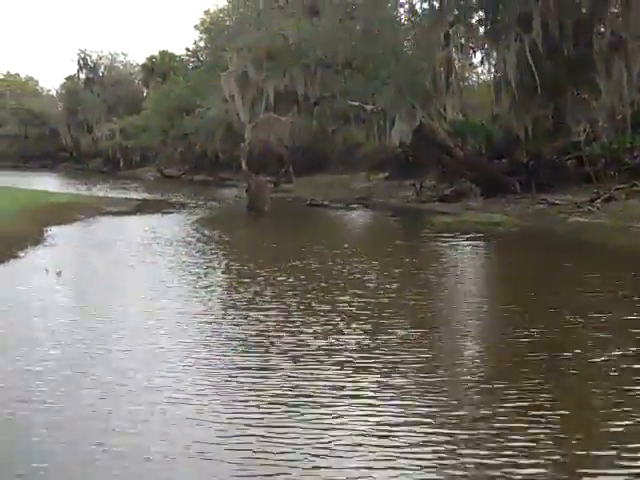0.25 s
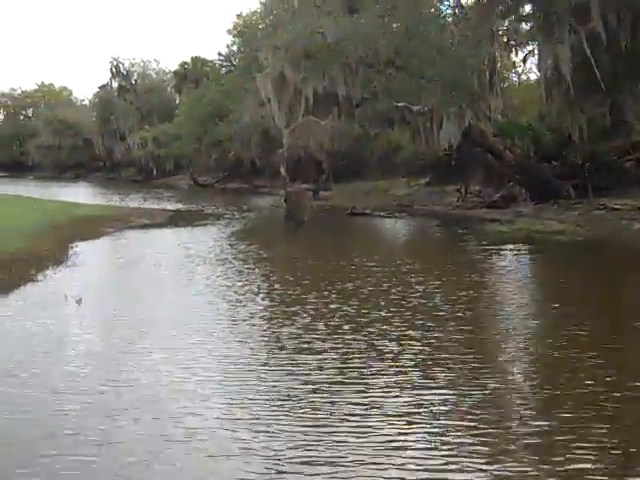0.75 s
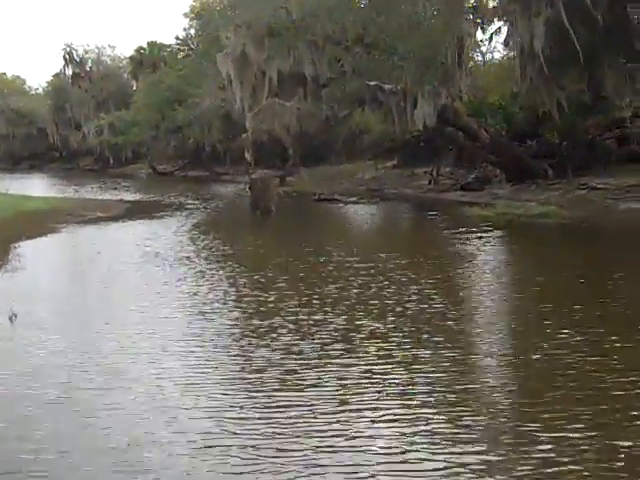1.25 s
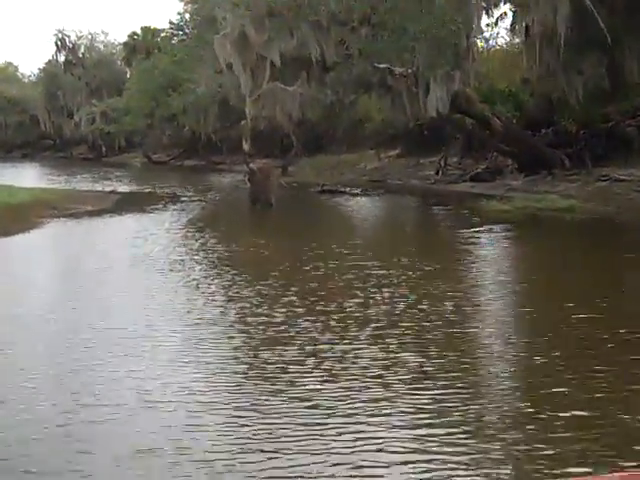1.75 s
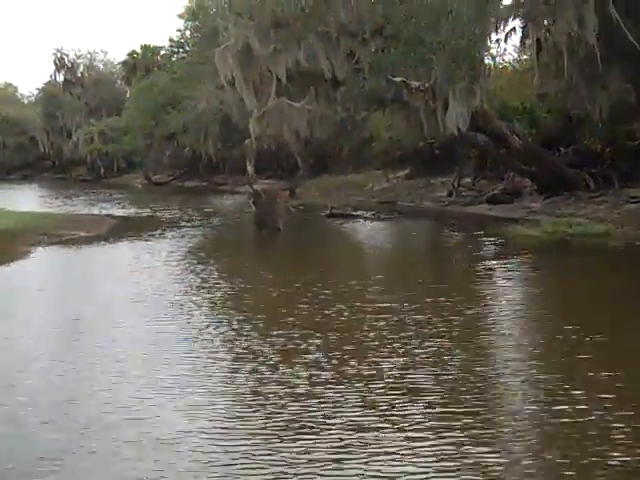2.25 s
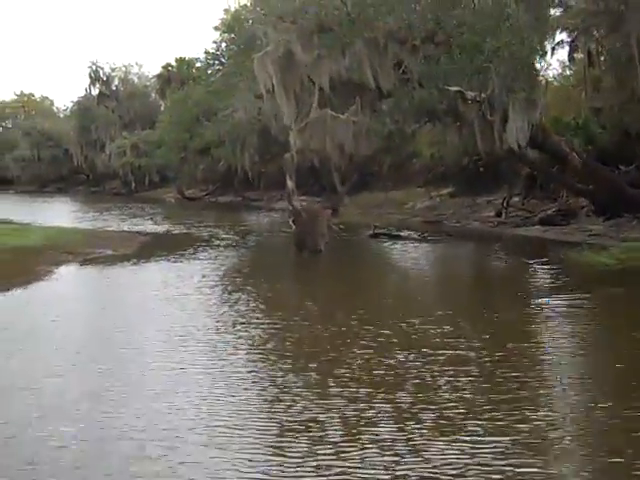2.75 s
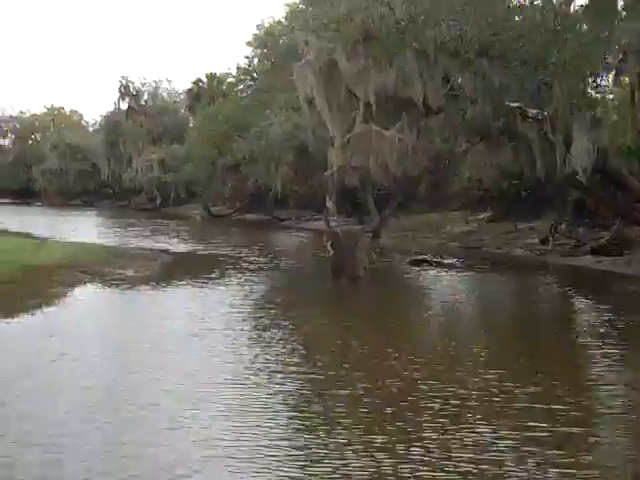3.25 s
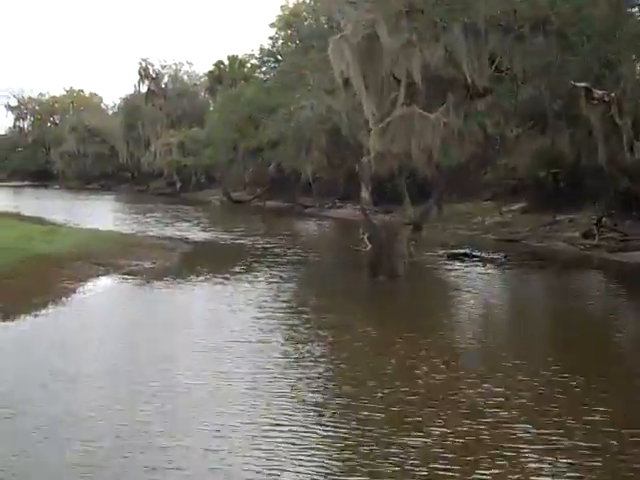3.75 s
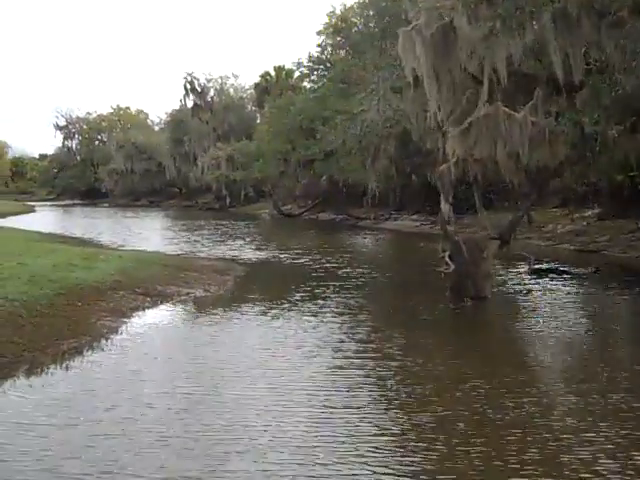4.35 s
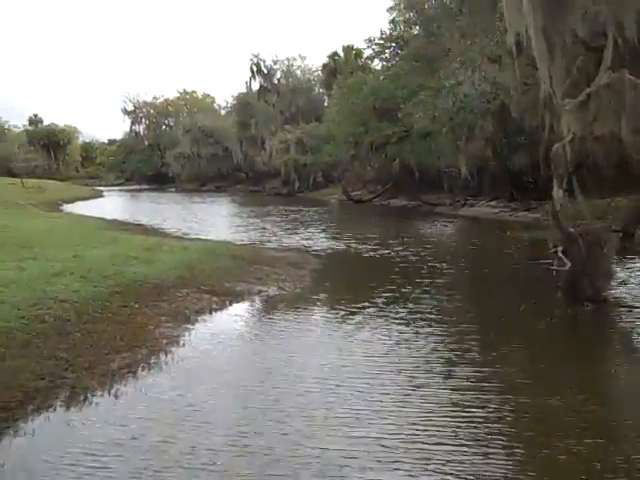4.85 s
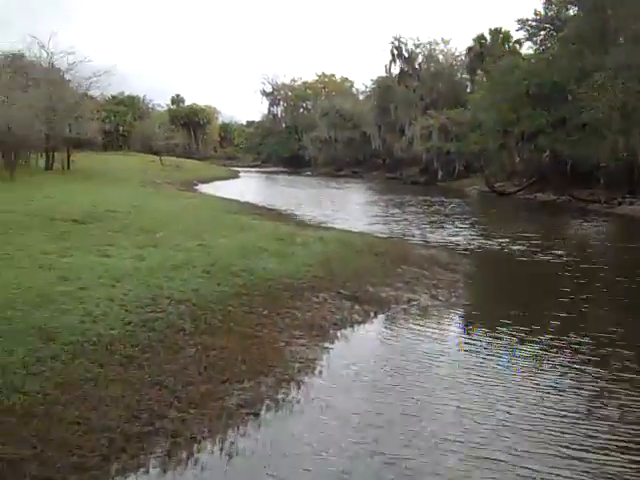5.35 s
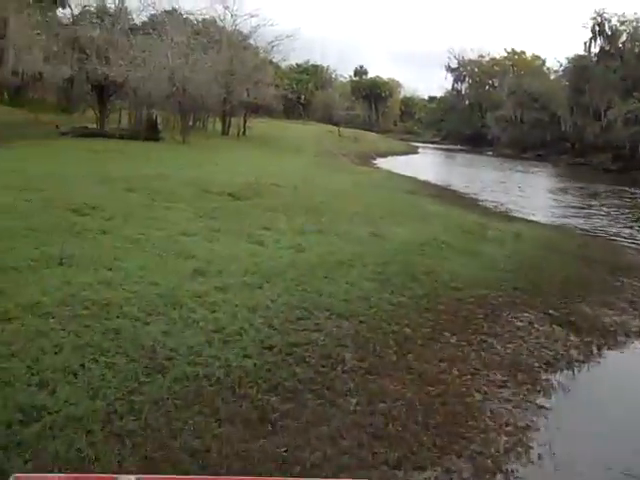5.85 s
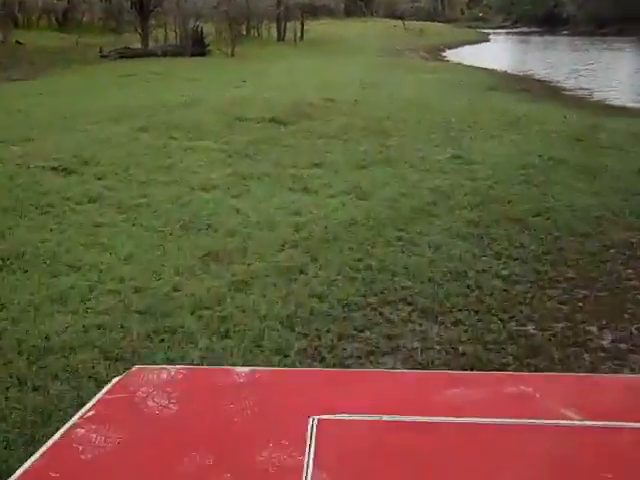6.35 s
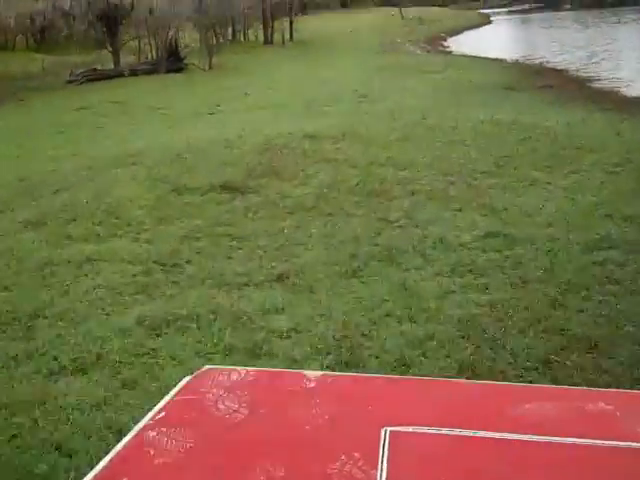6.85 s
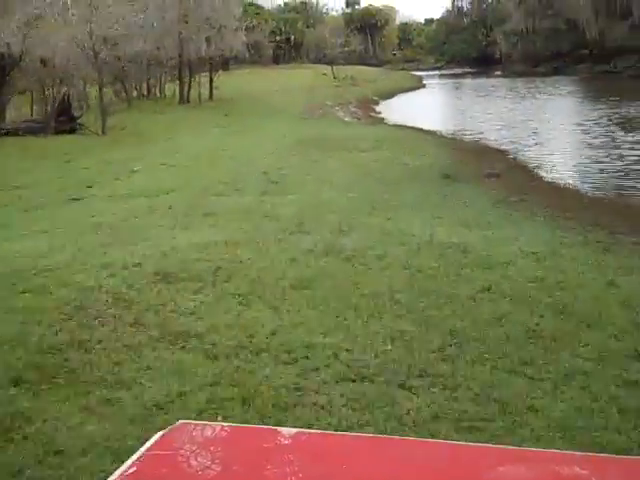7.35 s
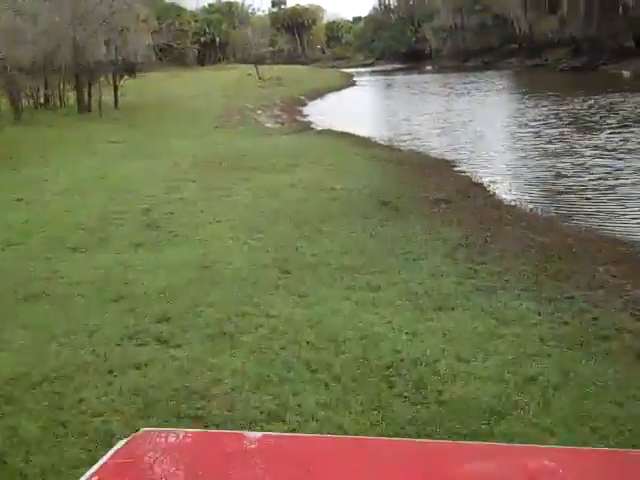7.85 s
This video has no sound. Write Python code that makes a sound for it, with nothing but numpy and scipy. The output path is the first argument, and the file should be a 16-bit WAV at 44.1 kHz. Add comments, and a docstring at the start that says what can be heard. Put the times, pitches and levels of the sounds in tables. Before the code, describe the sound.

Heard close up from the deck of an airboat outdoors, an eight-cylinder engine and geared air propeller run without pause. From 0 to 1 second the rough, throbbing drone rises slightly, sags until about 1.8, rises again to 3, and eases towards 3.5. Propeller and exhaust tones beat together over a low wash roar, mid-pitched blade-tip rush and bright, wide airy hiss. A low wind gust buffets the microphone near 1.7, with a weaker one near 3.6. At about 3.8 the throttle opens: pitch leaps by roughly a third by 4.3, the rushing air swells, and revs climb further to a peak near 5.8. The higher, denser drone then holds, easing slightly from 7.4 to the end at 8. Faint gear whine swells now and then. Brief level dips make the sound flutter, especially from 4.6 to 5.9 and around 7; loud moments are softly overloaded.

```python
"""On the deck of an airboat: an eight-cylinder engine drives a geared air propeller.
Engine and blade tones are sums of wavering cosines locked to the revs, and they beat against each other.
A faint gear whine is one more such tone; roar, blade-tip rush, hiss and wind are shaped noise.
The revs waver, jump as the throttle opens, then ease back. The whole level dips briefly now and then."""
import sys
import numpy as np
from scipy import signal
from scipy.io import wavfile
from scipy.ndimage import uniform_filter1d

SR = 44100
rng = np.random.default_rng(int(sys.argv[2]) if len(sys.argv) > 2 else 0)


def pcm_store(signal):
    """Save signal as 16-bit PCM."""
    levels = np.round(np.clip(np.atleast_2d(signal), -1, 1) * 32767)
    wavfile.write(sys.argv[1], SR, levels.astype(np.int16).T)


N = 356769  # length in samples

BLADES_PER_CYCLE = 2.6192  # blade passes per engine cycle
EDGE_HZ = 14200  # top of the band that is kept

# engine speed; one cycle is two crank turns: (time [s], firing cycles a second [Hz])
ENGINE_SPEED = [(0.0, 18.76), (0.3, 19.38), (0.6, 20.47), (0.8, 20.9), (1.0, 21.04), (1.4, 20.36),
                (1.8, 19.97), (2.1, 20.22), (2.6, 21.1), (3.0, 21.44), (3.2, 21.31), (3.55, 20.66),
                (3.81, 20.73), (4.1, 25.0), (4.3, 27.0), (4.8, 27.22), (5.0, 27.5), (5.4, 29.82),
                (5.6, 30.6), (5.8, 30.76), (6.4, 30.12), (7.4, 29.8), (8.09, 28.4)]
# exhaust tones before other level changes: (multiple of the cycle rate, rms level [dB])
EXHAUST_TONES = [(2, -54), (3, -38.5), (4, -44.5), (5, -28), (6, -30.5), (7, -33.5), (8, -21.5), (9, -54),
                 (10, -33), (11, -28), (12, -50), (13, -27.5), (14, -60), (15, -44), (16, -23.5), (17, -32),
                 (18, -40), (19, -27), (20, -44), (21, -29), (22, -35), (23, -25), (24, -33)]
# change of the exhaust tones at full throttle: (multiple of the cycle rate, change [dB])
FULL_THROTTLE_CHANGE = [(4, -0.5), (5, 3), (6, -6.5), (7, -16), (8, 1.03), (9, 7), (10, -21), (11, -1),
                        (13, -5), (16, 4)]
# exhaust pipes and hull colour the engine tones: (frequency [Hz], gain [dB])
PIPE_COLOUR = [(40, -12), (90, 5), (125, -5), (150, 10), (170, -6), (195, 16), (225, 1.7), (260, -2),
               (300, 4), (340, 0.5), (380, -5), (450, -15), (560, -16.5), (740, -52)]
# tilt of the exhaust note per doubling of the multiple: (part throttle [dB], full throttle [dB])
EXHAUST_TILT = (-1.45, -0.35)
# blade tones before other level changes: (multiple of the blade rate, rms level [dB])
BLADE_TONES = [(1, -23.5), (2, -20.5), (3, -33), (4, -33), (5, -33.5), (6, -38.5), (7, -32), (8, -34.5),
               (9, -34), (10, -35.5), (11, -43), (12, -36.5)]
# path from the propeller to the seat: (frequency [Hz], gain [dB])
PROPELLER_PATH = [(45, -9.5), (80, 5.5), (130, -3.5), (170, -1.5), (210, 6), (250, 12.5), (300, 9),
                  (380, 2), (430, 2), (500, -16), (575, 2.5), (645, -4.5), (730, -4.5), (970, -15)]
# level changes of the shaft tones: (time [s], even firing [dB], uneven firing [dB], blade thrust [dB],
# blade sharpness [dB per doubling of the multiple])
TONE_LEVELS = [(0.0, -6.5, -3, -3, 1), (0.3, -0.5, 0, -11, 4), (0.9, -1.5, 1, 0.1, 0.5),
               (1.4, -3, 0.5, -1.5, 0.7), (1.9, 1, .3, -4, 1), (2.5, 2.5, 1, -0.7, 0.55),
               (3.2, 6.5, -2.5, -2, -0.3), (3.6, -2, -1.5, -3, 1.5), (3.95, 6, -1, 2, 0.3),
               (4.3, -1, 4.5, 5, 1.1), (4.6, 4, -3.5, 1.5, 2.5), (5.1, 0, -1, 2.1, -0.45),
               (5.8, -1, 0, -2.2, 0.9), (6.3, 2, -2, -1, 0.1), (7.2, 1.4, -0.8, -4.5, 1.9),
               (8.09, 4, 1.8, -6.5, 2)]
# gear whine between swells: (part throttle [dB], full throttle [dB])
RESTING_WHINE = (-60, -59)
# swells of the gear whine: (time [s], peak [dB], time from peak to 1/e of its power [s])
WHINE_SWELLS = [(0.3, -49, .12), (0.95, -51, .05), (1.75, -51, .15), (2.52, -52, .06), (3.42, -51, .06),
                (5.0, -53, .06), (5.57, -52, .1), (6.01, -51, .05), (6.25, -51, .07), (6.9, -50, .16),
                (7.37, -49, .08), (7.78, -50, .06)]
# shape of the propeller wash roar: (frequency [Hz], relative level [dB])
ROAR_SHAPE = [(15, -40), (40, -19), (70, -11), (110, -8), (170, -11), (250, -4.5), (340, -9), (450, -15.5),
              (650, -13.5), (900, -26.5), (1400, -31), (3000, -73)]
# shape of the rush of blade-tip eddies: (frequency [Hz], relative level [dB])
TIP_SHAPE = [(300, -39), (550, -9), (750, -2), (1000, -3), (1400, -10), (2000, -16), (3000, -24.5),
             (6000, -56)]
# hiss of air and spray, lifted by the microphone's treble peak: (frequency [Hz], relative level [dB])
HISS_SHAPE = [(1060, -27), (1800, -11.5), (2510, -9), (2910, -6.5), (4000, -6.5), (5440, -8.5),
              (6400, -7.5), (7200, -4.5), (7800, -.5), (8400, -3.5), (9820, -10.5), (11800, -12.5),
              (14000, -21.5)]
# level of the air noise: (time [s], roar [dB], blade-tip rush [dB], hiss [dB])
AIR_LEVELS = [(0.0, -22.5, -32, -34), (0.5, -20.5, -31.5, -33.5), (0.95, -20.5, -31.5, -32),
              (1.1, -20.5, -32.5, -33), (1.7, -19, -30, -31.5), (2.1, -21.5, -30.5, -32.5),
              (2.55, -19.5, -30, -32.5), (3.1, -25, -31.5, -33.5), (3.25, -21, -32, -33.5),
              (3.5, -20, -33, -33.5), (3.8, -17, -29.5, -32.5), (4.4, -17, -25.5, -29),
              (5.0, -19.5, -28.5, -33), (5.6, -21.5, -30, -33.5), (6.4, -24, -30.5, -33.5),
              (7.1, -22, -29, -34), (7.7, -24, -31, -35.5), (8.09, -19, -28, -33)]
# short bursts in the rush and hiss: (time [s], rise [dB], time from peak to 1/e of the rise [s])
AIR_BURSTS = [(0.052, 1, .03), (0.45, 1, .03), (0.96, 2.5, .04), (1.734, 0, .02), (3.237, 3, 0.046),
              (3.76, 2, .03), (4.31, 2, 0.017), (4.957, 3, .03), (5.878, 1, .03), (7.92, 1.5, 0.021)]
# shape of wind buffeting the microphones: (frequency [Hz], relative level [dB])
BUFFET_SHAPE = [(10, -25), (25, -6), (45, 5), (70, 11), (120, -34), (300, -70)]
# wind between gusts: (part throttle [dB], full throttle [dB])
RESTING_WIND = (-40, -39)
# gusts on the microphones: (time [s], peak [dB], time from peak to 1/e of its power [s])
WIND_GUSTS = [(0.8, -35, .2), (1.7, -21.5, 0.19), (2.7, -33, .1), (3.65, -30, .12), (7.7, -40, .2)]
# brief dips of the whole level: (time [s], depth [dB], time until 1/e of the depth is left [s])
LEVEL_DIPS = [(0.161, 6.5, 0.12), (0.713, 5.5, 0.1), (1.653, 4, 0.072), (1.88, 2, 0.11), (2.281, 2, 0.1),
              (2.624, 4.5, 0.11), (3.618, 2.2, 0.12), (3.855, 5, 0.077), (3.967, 5.5, 0.94),
              (4.626, 7, 0.096), (5.09, 5.5, 0.083), (5.347, 5, 0.073), (5.49, 1.5, 0.084),
              (5.641, 4, 0.071), (5.76, 3.5, 0.068), (5.89, 1.5, 0.071), (6.167, 2.5, 0.102),
              (6.931, 5, 0.07), (7.083, 5, 0.081), (7.201, 5, 0.085), (7.363, 2.5, 0.048), (7.65, 2.5, .06),
              (7.94, 2, 0.043)]
# how alike left and right are in the air noise: (frequency [Hz], likeness [0-1])
STEREO_LIKENESS = [(60, 0.57), (130, 0.93), (280, 1), (610, 0.97), (1330, 0.67), (2870, 0.025),
                   (6230, 0.079), (13500, 0.01)]
# stereo balance: (frequency [Hz], left minus right [dB])
STEREO_BALANCE = [(60, -4), (110, -0.5), (200, -0.5), (360, -1), (670, -2.5), (1220, -3.0), (2220, 4),
                  (4050, 2.5), (7400, 11), (13500, -2)]


def engine():
    """Eight firings a cycle give the even tones; uneven cylinder banks fill in the other multiples."""
    speed_hz = curve(ENGINE_SPEED)
    scatter = unsteady(turns=0.0035)
    opening = throttle()
    even_db, uneven_db = curve(TONE_LEVELS), curve(TONE_LEVELS, axis=2)
    tilt_db = opened(EXHAUST_TILT)
    multiples, change_db = np.transpose(FULL_THROTTLE_CHANGE)
    out = 0
    for k, base_db in EXHAUST_TONES:
        firing_db = uneven_db if k % 8 else even_db
        level_db = base_db + firing_db + opening * np.interp(k, multiples, change_db)
        level_db = level_db + tilt_db * np.log2(k / 8)
        # above the hull's boom a tone trails by a quarter turn
        lag = 0.25 / (1 + np.exp((151.3 - k * speed_hz) / 0.8))
        out = out + tone(k, level_db, k * scatter - lag, PIPE_COLOUR, waver_db=0.8 + 0.03 * k, sway_db=0.55)
    return out


def propeller():
    """Each blade pass is a thump smeared in time; turbulence ruffles its higher multiples more."""
    angle, smear = -0.467, 0.303  # starting angle and smear, in turns of the blade tone
    thrust_db, sharp_db = curve(TONE_LEVELS, axis=3), curve(TONE_LEVELS, axis=4)
    scatter = unsteady(turns=0.01)
    out = 0
    for m, base_db in BLADE_TONES:
        start = (angle + scatter) * m + smear * m ** 2
        level_db = base_db + thrust_db + sharp_db * np.log2(m)
        multiple = m * BLADES_PER_CYCLE
        out = out + tone(multiple, level_db, start, PROPELLER_PATH, waver_db=0.9 + 0.07 * m, sway_db=0.8)
    return out


def gears():
    """Whine of the reduction teeth, blurred by chatter; its reflections drift from side to side."""
    teeth = 96  # whine waves per engine cycle
    chatter = 0.3 * wander(45)  # in turns of the whine
    level_db = swelling(opened(RESTING_WHINE), WHINE_SWELLS)
    uncoloured = [(1000, 0), (4000, 0)]
    return tone(teeth, level_db, chatter, uncoloured, waver_db=2.3, sway_db=5.0)


def roar():
    """Low roar of the propeller wash: noise pulsing with the blade passes."""
    noise = air(ROAR_SHAPE, patchy_db=1.5, gust_db=0.3, chop=0.11, size=2048)
    return gain_of(curve(AIR_LEVELS)) * noise


def tip_rush():
    """Rush of the eddies at the blade tips: mid-pitched noise with short bursts."""
    noise = air(TIP_SHAPE, patchy_db=1.0, gust_db=0.6, chop=0.042, size=1024)
    return gain_of(curve(AIR_LEVELS, axis=2)) * noise * bursts()


def hiss():
    """Bright hiss of air and spray, sharing the bursts of the blade-tip rush."""
    noise = air(HISS_SHAPE, patchy_db=0.5, gust_db=0.4, chop=0.056, size=512)
    return gain_of(curve(AIR_LEVELS, axis=3)) * noise * bursts()


def wind():
    """Wind buffeting the microphones: very low noise that swells in gusts."""
    buffet = air(BUFFET_SHAPE, patchy_db=2.5, gust_db=2.5, chop=0, size=4096)
    return gain_of(swelling(opened(RESTING_WIND), WIND_GUSTS)) * buffet


def tone(multiple, db, start, colour, waver_db, sway_db):
    """One tone locked to the engine, coloured by its path, wavering and swaying between left and right."""
    hz = multiple * curve(ENGINE_SPEED)
    turns = np.cumsum(hz) / SR + start
    wave = -np.sqrt(2) * np.cos(2 * np.pi * turns)
    # look the tables up every 64 samples, as the pitch moves slowly
    colour_db, left_db = (np.repeat(read(table, hz[::64]), 64)[:N] for table in (colour, STEREO_BALANCE))
    wave *= gain_of(db + colour_db + waver_db * wander(2.18))
    left = gain_of(left_db / 2 + sway_db * wander(2.17))
    return np.array([wave * left, wave / left])


def air(spectrum, patchy_db, gust_db, chop, size):
    """Two-channel noise in drifting patches, gusting, and chopped at the blade rate by the given depth."""
    hop = size // 4
    frames, hz = N // hop + 5, np.fft.rfftfreq(size, 1 / SR)
    a, b, c, d, patches = rng.standard_normal((frames, len(hz), 5)).T
    # smooth the patches over frequency, then over time
    patches = uniform_filter1d(patches, size=10, axis=0)
    patches = evened(uniform_filter1d(patches, size=12, axis=1))
    # the right channel shares part of the left one
    same = np.clip(read(STEREO_LIKENESS, hz), -1, 1)[:, None]
    left, other = a + 1j * b, c + 1j * d
    z = np.array([left, same * left + np.sqrt(1 - same ** 2) * other])
    z *= gain_of(read(spectrum, hz)[:, None] + patchy_db * patches)
    z *= gain_of(np.outer([0.5, -0.5], read(STEREO_BALANCE, hz)))[:, :, None]
    noise = signal.istft(z, nperseg=size, noverlap=size - hop)[1][:, :N]
    passes = np.cumsum(BLADES_PER_CYCLE * curve(ENGINE_SPEED)) / SR
    noise *= 1 + np.clip(chop, 0, 1) * np.cos(2 * np.pi * passes)
    noise *= gain_of(gust_db * wander(14))
    return noise / np.sqrt(np.mean(noise.mean(0) ** 2))


def bursts():
    """Bell-shaped lifts shared by the blade-tip rush and the hiss."""
    t = np.arange(N) / SR
    return gain_of(sum(db * np.exp(-((t - s) / half) ** 2) for s, db, half in AIR_BURSTS))


def dips():
    """Each dip falls within a few milliseconds, lingers, and recovers."""
    t, db = np.arange(N) / SR, np.zeros(N)
    for s, depth_db, back in LEVEL_DIPS:
        db -= depth_db * (t > s) * np.exp(-((t - s) / back) ** 2)
    return gain_of(uniform_filter1d(db, size=300))


def throttle():
    """Throttle opening from 0 to 1, read from the revs."""
    return np.clip((curve(ENGINE_SPEED) - 21.8) / 6.3, 0, 1)


def opened(pair):
    """Blends a part-throttle and a full-throttle value by the throttle."""
    return pair[0] + (pair[1] - pair[0]) * throttle()


def unsteady(turns):
    """Timing scatter in turns of the lowest tone; it steadies as the throttle opens."""
    return turns * (1 - 0.57 * throttle()) * wander(9.5)


def swelling(base_db, swells):
    """A resting level in dB with bell-shaped swells of power added to it."""
    t = np.arange(N) / SR
    power = gain_of(2 * base_db)
    for s, peak_db, half in swells:
        power = power + gain_of(2 * peak_db) * np.exp(-((t - s) / half) ** 2)
    return 10 * np.log10(power)


def wander(hz):
    """Slow random drift of rms near 1, up to about hz."""
    # one random step every 256 samples, smoothed twice
    steps = rng.standard_normal(N // 256 + 2)
    steps = uniform_filter1d(steps, max(round(SR / 256 / hz / 2), 1))
    steps = evened(uniform_filter1d(steps, size=5))
    return np.interp(np.arange(N) / 256, np.arange(len(steps)), steps)


def curve(rows, axis=1):
    """One column of a time table, drawn as straight lines through every sample."""
    table = np.array(rows)
    return np.interp(np.arange(N) / SR, table[:, 0], table[:, axis])


def read(points, hz):
    """Reads a frequency table on a logarithmic frequency axis."""
    f, value = np.transpose(points)
    return np.interp(np.log(hz + 1), np.log(f + 1), value)


def evened(x):
    """Scales a signal to rms 1."""
    return x / np.sqrt(np.mean(x ** 2) + 1e-20)


def gain_of(db):
    """Turns decibels into a gain."""
    return 10 ** (np.asarray(db) / 20)


def scene():
    """Engine, propeller, gears, air and wind, all under the same dips."""
    machine = engine() + propeller() + gears()
    moving_air = roar() + tip_rush() + hiss() + wind()
    return (machine + moving_air) * dips()


def record(dry):
    """Soft overload of the input stage, then a steep cut of the highest treble."""
    ceiling = 1.24
    soft = ceiling * np.tanh(dry / ceiling)
    treble_cut = signal.firwin(4095, EDGE_HZ, window=("kaiser", 9), fs=SR)
    return signal.oaconvolve(soft, treble_cut[None], "same")


dry = scene()
out = record(dry)
pcm_store(out)
```